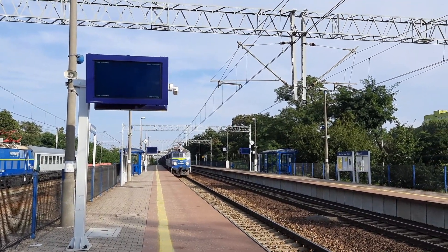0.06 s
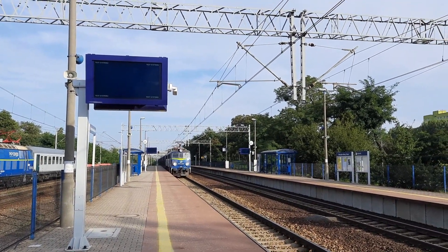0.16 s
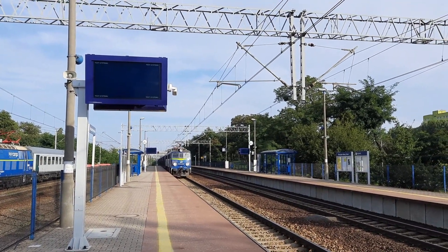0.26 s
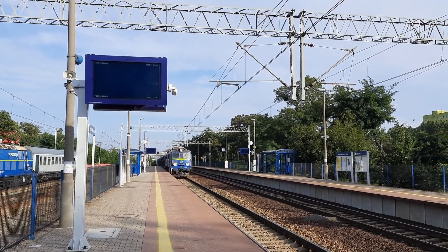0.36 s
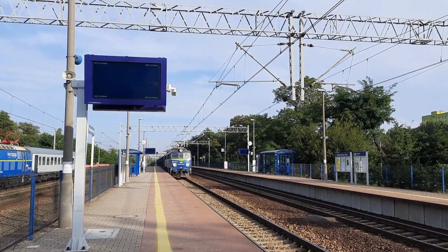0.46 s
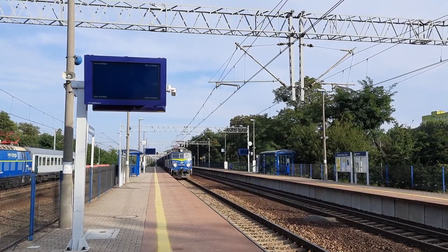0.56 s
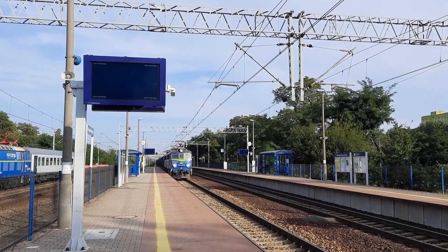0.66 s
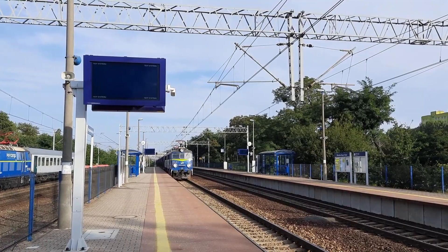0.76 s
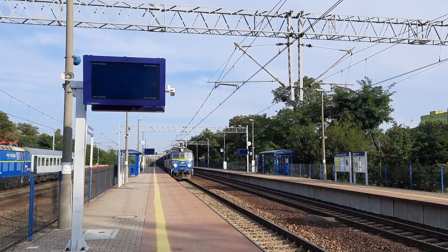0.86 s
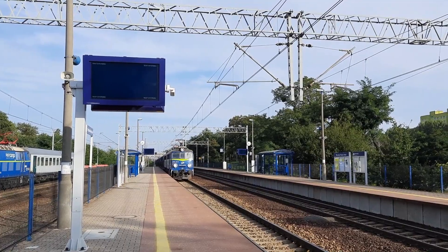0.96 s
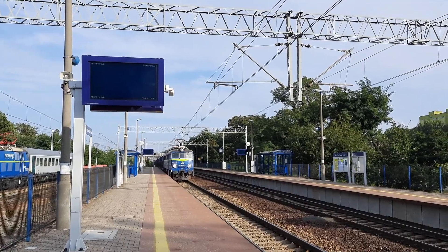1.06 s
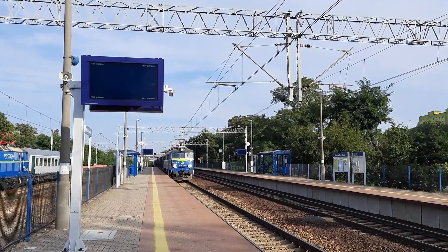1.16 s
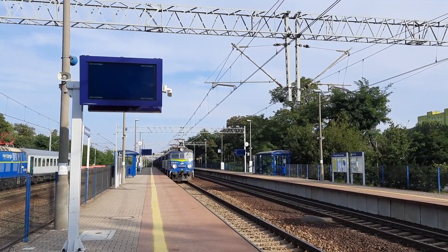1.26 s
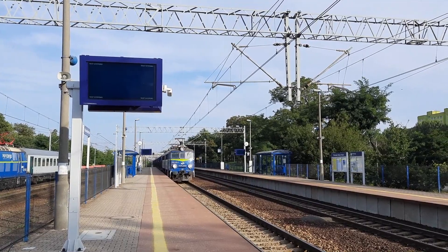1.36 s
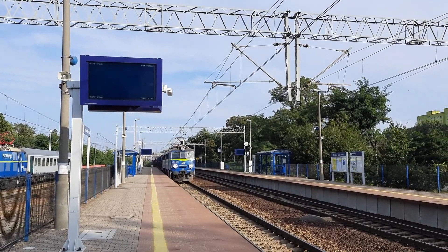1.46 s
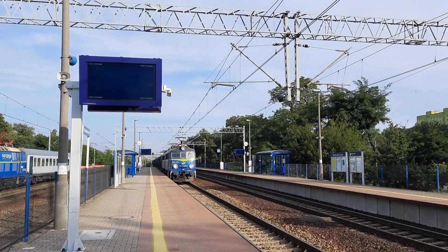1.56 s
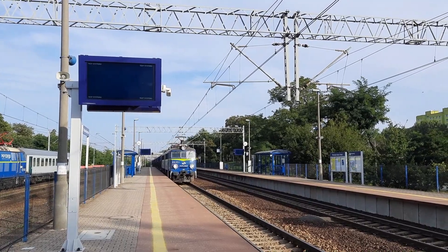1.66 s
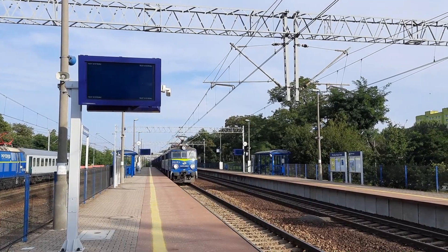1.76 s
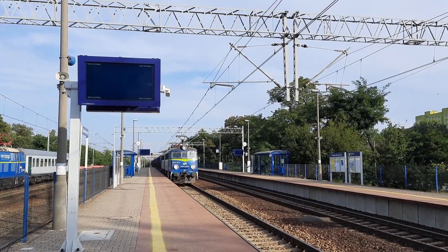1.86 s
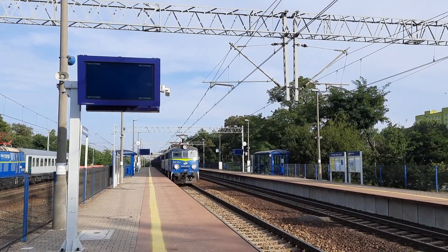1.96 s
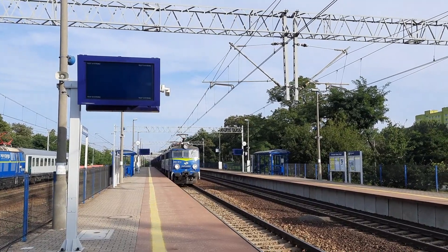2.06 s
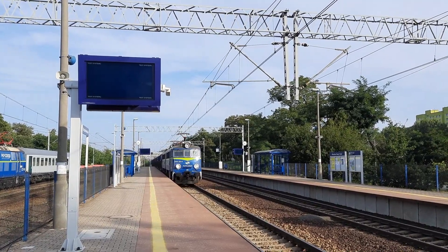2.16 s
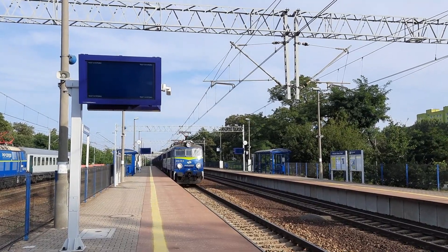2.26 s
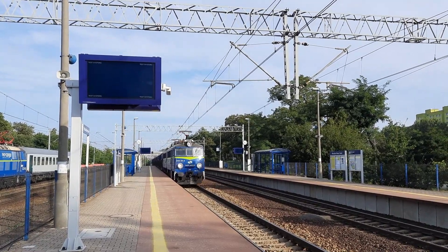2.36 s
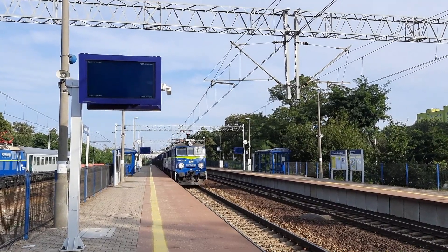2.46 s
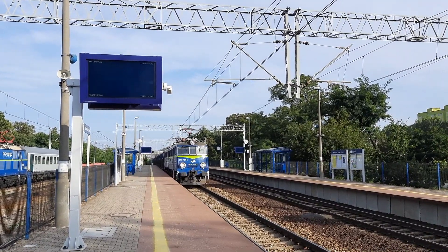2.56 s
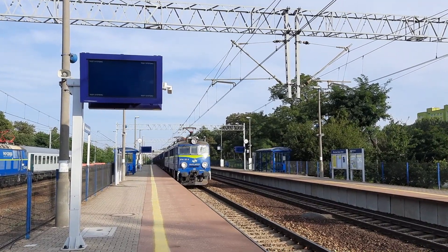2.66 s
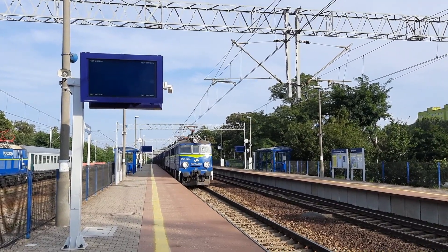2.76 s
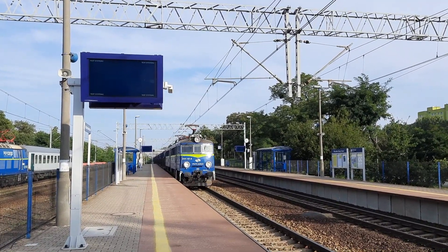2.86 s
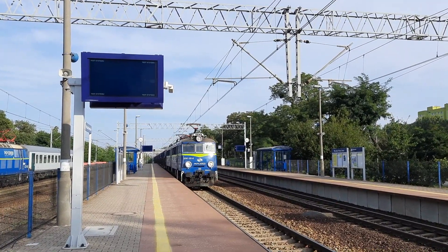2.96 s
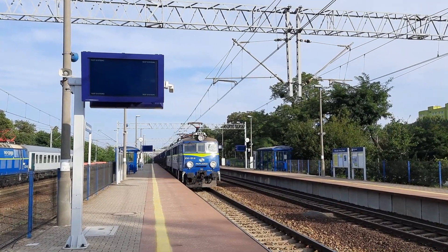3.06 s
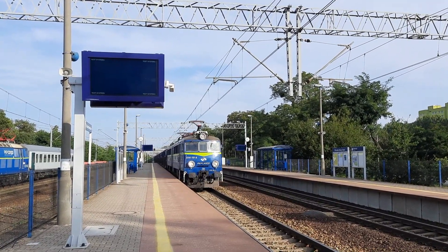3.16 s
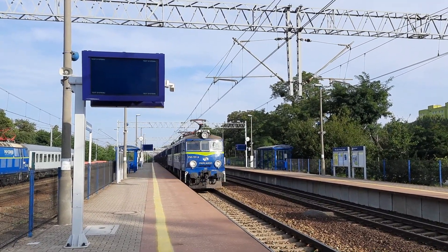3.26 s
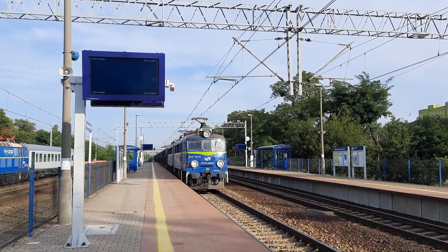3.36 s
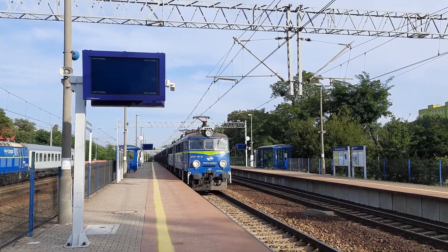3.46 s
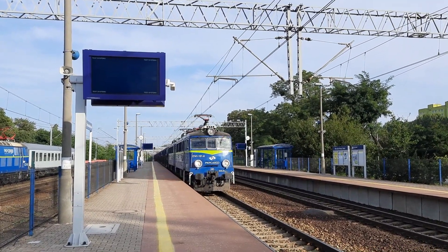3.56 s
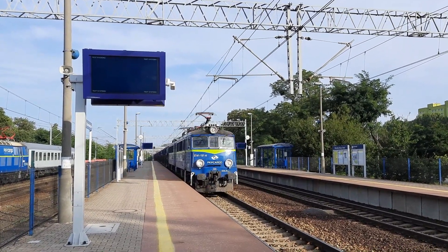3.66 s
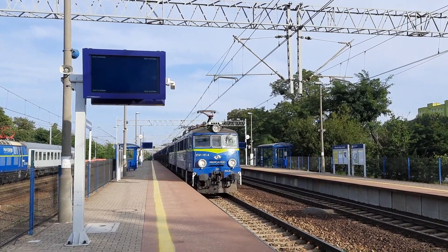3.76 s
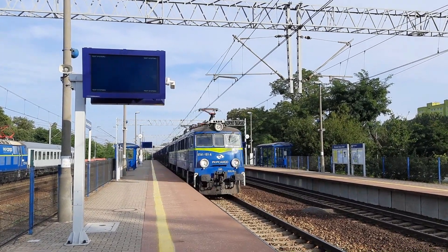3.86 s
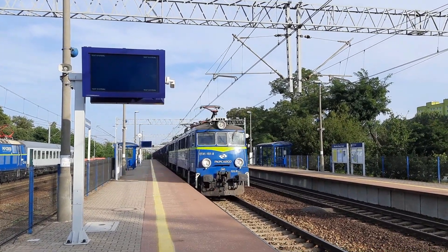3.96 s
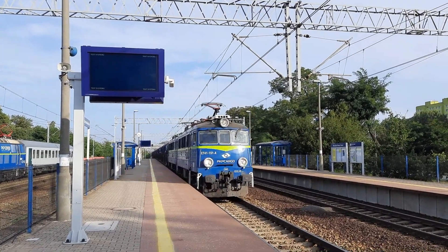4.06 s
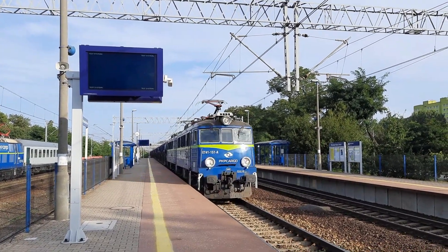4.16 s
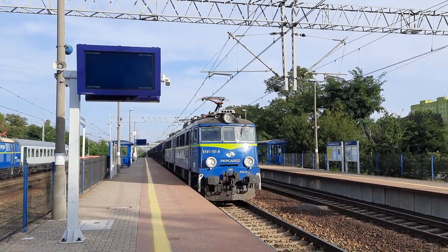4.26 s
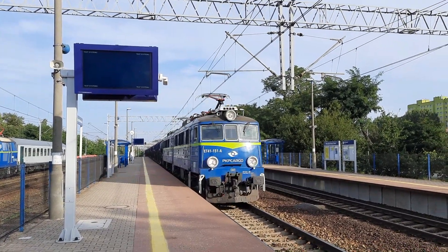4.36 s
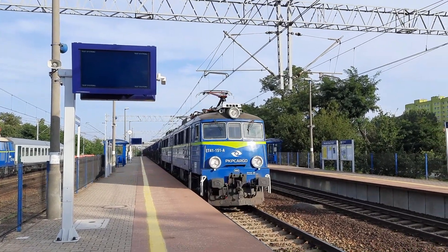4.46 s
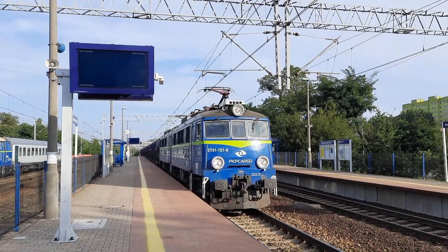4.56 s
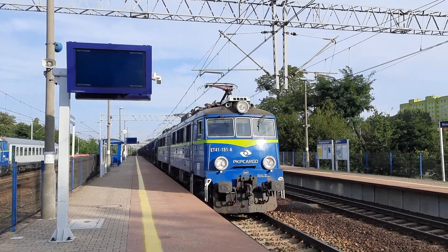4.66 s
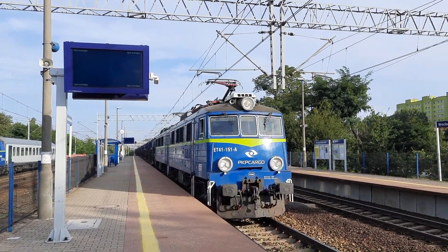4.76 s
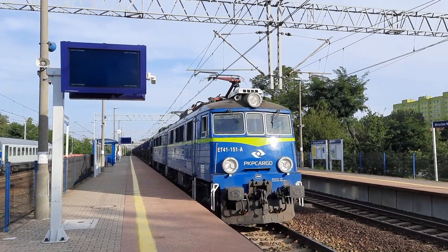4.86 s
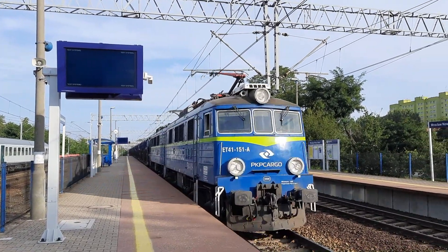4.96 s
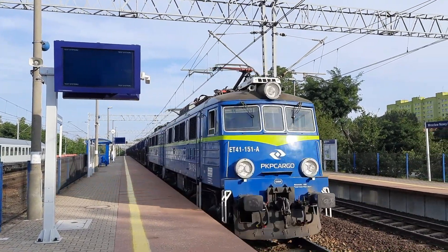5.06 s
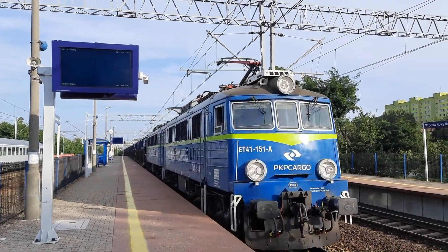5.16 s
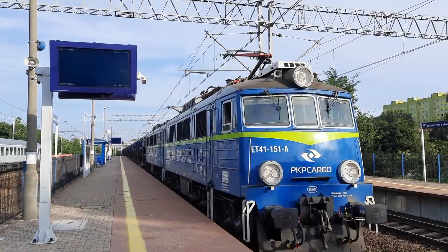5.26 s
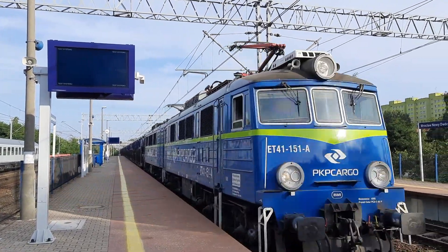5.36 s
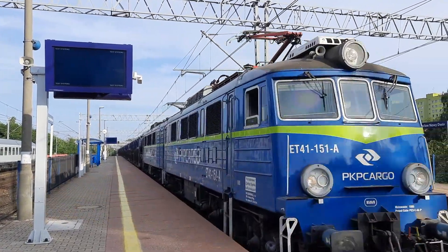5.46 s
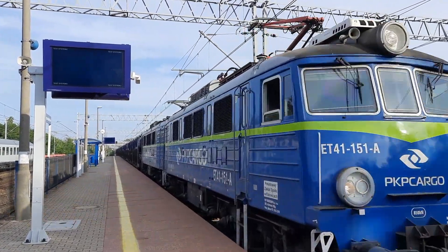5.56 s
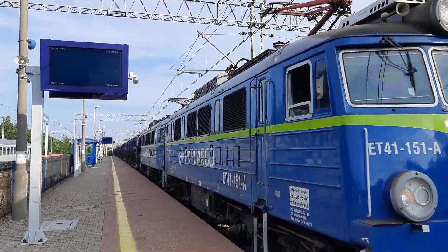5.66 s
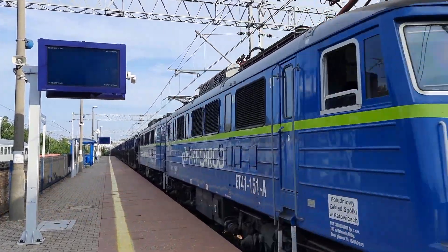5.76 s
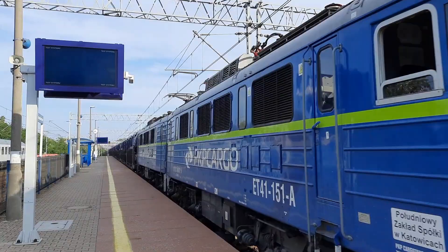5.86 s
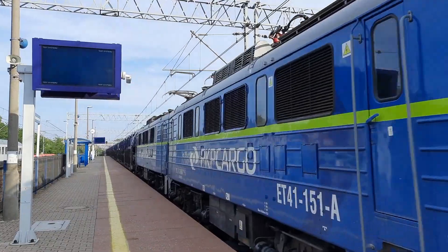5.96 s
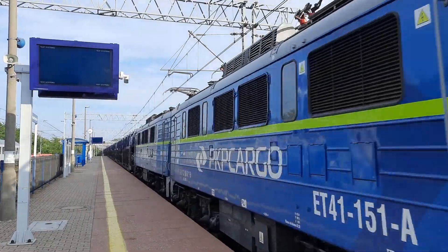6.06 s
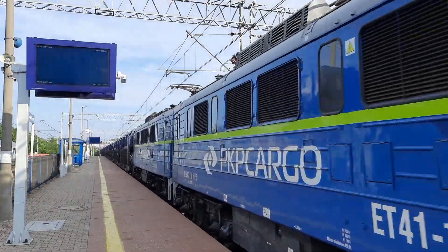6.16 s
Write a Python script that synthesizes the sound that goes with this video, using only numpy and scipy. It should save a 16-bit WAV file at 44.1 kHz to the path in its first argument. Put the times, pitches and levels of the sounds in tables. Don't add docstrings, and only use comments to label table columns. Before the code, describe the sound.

Open-air platform in stereo with soft low wind buffeting. From 0 s an electric locomotive is distant: a low, rough gear hum, several related tones around 200 to 600 Hz, throbbing irregularly as motors beat, over faint rumble and gritty wheel rush. At 0.7 s a bright click and short fizzing burst of compressed air, with a thin whistle, sounds slightly right and dies in a brief echo. From 1 to 4 s the hum edges up in pitch and swells steadily; sleepers and rails rumble more, with tiny, very high flange flickers. After 4 s these squeaks come more often. Around 5.2 to 5.4 s a quick string of valve spits sputters. The leading wheels' close, rattling roar peaks from 5.5 s as the engine passes, with a faint air leak near 6 s. Hum, heavy rumble, grinding and hiss stay loud to the end, at about 6.2 s.

```python
import sys
import numpy as np
from scipy import signal
from scipy.fft import rfft, irfft, next_fast_len
from scipy.io import wavfile
from scipy.ndimage import uniform_filter1d, map_coordinates

SR = 44100
rng = np.random.default_rng(int(sys.argv[2]) if len(sys.argv) > 2 else 0)


def log_audio(samples):
    frames = np.atleast_2d(samples).T
    limited = np.clip(frames, -1, 1)
    pcm = np.round(limited * 32767).astype(np.int16)
    wavfile.write(sys.argv[1], SR, pcm)


def boost(x):
    u = np.asarray(x, float) / 20
    return 10 ** u


N = 274302

# time in seconds, locomotive and wagon levels in dB under arrival.
APPROACH = [(0.0, -20.5, -13), (0.78, -16, -9.5), (1.56, -14, -8.5), (2.33, -10, -6.5), (3.11, -8.5, -4),
            (3.89, -5.5, -3.5), (4.66, -4.5, -1), (5.44, -3, -1.3), (6.22, 0.5, -1)]
# time in seconds, rate in Hz.
TOOTH_RATE = [(0, 101.8), (1, 102.8), (2, 104), (3, 104.6), (4, 106.1), (5, 106.5), (6.22, 106.4)]
# multiple, level at arrival in dB, growth in dB per dB of nearness,
# roughness as a ratio, sideband knots per second, port lead as a ratio.
GEAR_ORDERS = [
    (2, -19.5, 1.345, 0.34, 45, 4.5),
    (3, -23, 1.12, 0.68, 55, -2),
    (4, -17, 1.35, 0.22, 55, 0.5),
    (6, -35, 1.44, 0.69, 41, -0.5),
]
ORDER_SIDE_DB = [-31, -25.5, -18, -7.5]
# multiple, level in dB under the fourth order, gain at the pass in dB.
FAINT_ORDERS = [(1, -32, 20.5), (5, -21.5, -1), (8, -27.5, -1.5), (10, -32, 4), (14, -46, 15)]
# time in seconds, swell or dip in dB, half length in seconds.
BEATS_ORDER_2 = [(0.06, 15, 0.049), (.16, 13.5, 0.032), (0.362, 11.5, 0.096), (1.184, -15, 0.088),
                 (1.186, 17, 0.23), (1.4, -15, 0.037), (1.552, 9.5, 0.03), (1.763, -6, 0.051),
                 (2.222, 4.5, 0.081), (2.43, -12, 0.038), (3.193, 7.5, .04), (4.237, 5.5, 0.47),
                 (4.35, -2.5, 0.12), (4.557, 1.5, .04), (4.7, -1, 0.083), (4.738, -2, .05), (4.85, 1, .03),
                 (5.69, 1, .05), (5.217, -11, 0.025), (5.457, -5, 0.058), (5.802, -1.5, 0.025),
                 (5.883, 5.5, 0.13), (6.085, -4.5, 0.054), (.44, 3, 0.042), (1.986, -4, 0.049),
                 (2.56, 2, 0.13), (2.81, 3.5, .03), (3.01, 0.5, 0.035), (3.34, -2, .04), (3.48, -3, 0.063),
                 (3.61, -5, .05), (6.002, -2.5, 0.036)]
BEATS_ORDER_3 = [(.49, 9.5, 0.034), (.91, 7.5, 0.03), (1.648, 8.5, 0.05), (2.69, 8, 0.025),
                 (2.75, -7, 0.42), (3.12, -6, 0.042), (3.2, 9.5, 0.23), (3.55, 3.5, 0.04),
                 (3.7, 6.5, 0.085), (3.8, 0, 0.025), (4.11, -8, 0.03), (4.3, -6, 0.1), (4.51, 12.5, 0.0094),
                 (5.09, 10, 0.043), (4.85, 1, 0.028), (5.4, -9, 0.086), (5.51, 7.5, 0.049),
                 (5.75, 1, 0.045), (5.62, 6.5, 0.034), (5.84, 6.5, 0.088), (5.93, -7, 0.03),
                 (6.09, -7, 0.058), (.06, 5, 0.046), (.82, 2, 0.045), (1.01, 7, .05), (1.38, 6, 0.059),
                 (1.52, -4, .07), (2.51, -7, .08), (3.02, -4, .08), (3.66, -6.5, 0.032), (4.94, -4, .05),
                 (5.35, 4, 0.034)]
BEATS_ORDER_4 = [(.29, 8, 0.055), (.62, 9, 0.4), (.69, -15, 0.03), (1.23, 9.5, 0.1), (1.64, 7.5, 0.098),
                 (2.12, -14, 0.034), (2.45, 4, 0.16), (2.64, -2.5, 0.043), (2.85, 8, 0.31),
                 (3.12, -15, 0.043), (3.25, 3, 0.067), (3.57, -9.5, 0.19), (4.18, -1, 0.026),
                 (4.43, -1.5, 0.022), (3.87, 6, 0.011), (4.23, -15, 0.022), (4.56, -22, 0.031),
                 (4.87, -5, 0.13), (5.2, 1.5, 0.12), (5.419, -14, 0.016), (5.8, -1.5, 0.071),
                 (6.0, -3.5, 0.018), (6.06, -4, 0.018), (6.12, 3, .04), (6.2, -8, 0.028), (.15, 5, 0.053),
                 (.47, 1, 0.058), (.84, -6.5, 0.042), (1.09, -0.5, 0.036), (1.94, 1, 0.039),
                 (2.2, 3.5, 0.051), (2.52, 2, 0.046), (3.04, 0, .04), (3.48, -14, 0.057),
                 (3.74, 4.5, 0.049), (3.8, -8, .03)]
BEATS_ORDER_6 = [(.1, 14, 0.039), (.65, 19.5, 0.47), (.7, -12.5, 0.13), (1.32, 11.5, .15),
                 (2.1, 11.5, 0.059), (3.07, 9.5, 0.17), (3.5, 3, 0.098), (4.02, 10, 0.051),
                 (4.49, -11, 0.11), (4.67, 9, .03), (5.21, 8, 0.18), (3.7, -3, 0.055), (5.63, 3.5, .08),
                 (5.83, 9, 0.075), (6.01, 7, 0.029), (6.19, 9, 0.088), (.45, 4, .03), (1.76, -9, .1),
                 (1.9, 6, 0.046), (2.36, -9, .05), (2.44, 9, .04), (2.52, -5, .06), (3.25, -9.5, 0.12),
                 (3.8, 6, .06), (3.91, -4, 0.042), (4.28, 6, .06), (4.88, 1.5, .07), (5.3, -5, .06),
                 (5.41, 5.5, .05)]
SAG_FROM_S, SAG_HZ_PER_S = 4.3, 4.1
ROUGHENS_S, ROUGHENS_RATIO = 3.05, 0.8

# frequency in Hz, density in dB per Hz.
GROUND_SPECTRUM = [(15, -73.5), (30, -38.5), (42, -25.5), (55, -1.5), (75, -5), (110, 2.5), (160, -1.5),
                   (210, 3), (300, -64)]
SLEEPER_SPECTRUM = [(120, -19), (170, 15.5), (240, 19), (305, 17.5), (350, 9.5), (390, 10), (470, -46.5)]
RAIL_SPECTRUM = [(330, -14), (400, 0.5), (465, 1.5), (510, -5), (550, -12), (620, -8.5), (680, -16),
                 (760, -29.5), (900, -73.5)]
DISC_SPECTRUM = [(550, -48), (700, 3.5), (800, 1.5), (1050, 4), (1250, 3), (1450, -6), (1800, -58)]
GRIND_SPECTRUM = [(900, -3), (1400, 0), (1800, 1.5), (2100, 0.5), (2500, 0.5), (3000, -2.5), (3500, -1.5),
                  (4000, -4.5), (4600, -5.5), (5200, -13.5), (6000, -26.5)]
COOLING_AIR_SPECTRUM = [(4000, -25), (5000, -2), (5600, 1), (6300, -0.5), (6900, -1.5), (7400, 1.5),
                        (8000, -5), (8800, -10.5), (10000, -16)]
HISS_SPECTRUM = [(7500, -39), (8800, -11), (10000, -9), (11000, -2), (11900, 2.5), (12800, -2.5),
                 (13600, -1), (14500, -6), (15700, -3.5)]
BOGIE_SPECTRUM = [(900, -21), (1300, 7.5), (1500, 0.5), (2200, -5.5), (2900, -2.5), (4000, -6),
                  (5700, -11.5), (7000, -21.5), (9000, -45)]
# time in seconds, level in dB, half length in seconds.
AXLE_THUDS = [(0.29, -9.5, 0.043), (0.54, -4, 0.056), (0.95, -3, 0.22), (1.35, 2, 0.077), (1.95, 3.5, 0.07),
              (2.24, -12, 0.047), (2.69, -5, 0.12), (3.85, -5, 0.063), (4.84, 1.5, 0.38), (5.73, 1.5, 0.15)]
# time in seconds, level in dB, half length in seconds.
SLEEPER_STRETCHES = [(2.44, -0.5, 0.12), (2.99, -3.5, 0.86), (4.28, -3, 0.38), (3.74, 1, 0.049),
                     (4.6, -0.5, 0.092), (4.87, 3.5, 0.33), (5.4, 2, 0.13), (6.17, -1, 0.057),
                     (3.92, 0.5, 0.074), (4.43, -1, .03), (5.03, -5, 0.045), (5.33, -7, 0.033),
                     (5.69, 0.5, 0.026), (6.11, -7.5, 0.023), (.85, 0, .07), (1.06, -4.5, .07),
                     (1.77, 2, 0.08), (2.17, -2, 0.085), (3.65, -4.5, .07)]
RAIL_STRETCHES = [(0.0, 6, 0.03), (1.16, 2, 0.059), (1.37, -1.5, 0.028), (2.08, 1.5, 0.19),
                  (4.04, -9.5, 0.026), (4.35, -0.5, 0.16), (3.4, 1, .06), (4.22, 0, .08), (4.67, -1, 0.025),
                  (5.92, -0.5, .08), (5.14, 0, 0.13), (5.15, -8, 0.034), (6.09, -10, 0.3), (.39, 3.5, .07),
                  (3.08, 2.5, .05), (5.59, -4, .04)]
GRIND_STRETCHES = [(.2, 0.5, 0.22), (.8, 0.5, 0.17), (2.3, 2, 0.33), (3.0, 0, 0.15), (4.0, 0, 0.33),
                   (5.1, 0, 0.16), (5.6, -0.5, .06), (5.82, 0.5, 0.044), (5.92, -0.5, .04),
                   (6.13, -0.5, .06), (.27, 0, .05), (.59, 0, .08), (.74, 0.5, 0.052), (1.3, 0.5, .1),
                   (1.57, 0, 0.065), (1.7, 0.5, 0.068), (1.92, -2, 0.081), (2.11, -0.5, 0.11),
                   (2.73, 1, 0.12), (2.92, -0.5, .08), (3.38, 0, 0.059), (4.03, 0, .06), (4.47, -0.5, .04),
                   (4.73, -2, 0.071), (5.24, -1.5, 0.1), (6.0, -2.5, .04)]
DISC_STRETCHES = [(.15, 1.3, .15), (1.0, -0.8, 0.27), (2.2, -1.5, .2), (3.0, -3, 0.24), (3.5, -1.3, 0.13),
                  (4.5, -1.7, .15), (4.9, 1.3, 0.3), (5.5, 1, 0.22), (.48, -1, 0.053), (1.15, 0.5, 0.12),
                  (2.01, 1.5, .07), (2.16, 4.5, .04), (2.37, 2.5, 0.068), (2.65, -0.5, .07),
                  (2.79, 3, 0.067), (3.25, -0.5, .06), (3.4, 1, 0.04), (3.81, 1, 0.034), (4.59, 1, .06),
                  (4.72, -1, .07), (4.97, 0, .06), (5.53, 4.5, 0.013), (5.63, 1, 0.036), (5.7, -1.5, .05)]
# level at arrival in dB, growth in dB per dB of nearness.
GROUND_GROWTH, SLEEPER_GROWTH, RAIL_GROWTH = (-33, 0.46), (-22, 0.98), (-19.5, 0.86)
DISC_GROWTH, GRIND_GROWTH, AIR_GROWTH = (-38, 0.88), (-38.5, 0.92), (-55.5, 0.63)
HISS_GROWTH, SONG_GROWTH = (-58, 0.94), (-70.5, 1.8)
DULL_HZ, DULL_DB, DULL_GROWTH = 14400, 2, 0.45
PASS_S, BOGIE_DB, BOGIE_DB_PER_S = 5.51, -41.5, 12
MASK_DB, MASK_S = -0.5, 0.39

# opening time in seconds, peak in dB, time open in seconds, fizz over the rest in dB.
FAR_VALVE_SPITS = [
    (.6945, -34, .004, -10),
    (.7015, -33, .05, 1),
    (.75, -50, .022, 15),
]
NEAR_VALVE_SPITS = [
    (5.2355, -36, .004, -9),
    (5.2405, -44, .024, 4.5),
    (5.266, -45.5, .022, 0),
    (5.29, -48, .014, 5),
    (5.3215, -45, .014, 6),
    (5.34, -53, .01, 6),
    (5.355, -57, .012, 5),
    (5.978, -54.5, .035, -1),
]
# level in dB, opening time in seconds, sag in dB per second,
# closing rate in dB per second.
FAR_VALVE = [
    (-6.5, 0.0065, 170, 800),
    (-5.5, 0.009, -20, 700),
    (-6.5, .010, -0.5, 500),
    (-10.5, .05, 0, 100),
]
NEAR_VALVE = [
    (-1, .012, 120, 900),
    (-2.5, .003, 90, 1100),
    (-1.5, .004, 90, 800),
]
# frequency in Hz, density in dB per Hz.
FAR_THROAT = [(3900, -33), (4200, -5), (4400, 0), (4850, -0.5), (5400, 2), (5900, -7), (6200, -35)]
FAR_NOZZLE = [(6050, -30), (6300, -9), (6480, -13), (6700, -7), (7000, -1), (7350, -6), (7800, -5.5),
              (8300, -26), (9200, -40.5)]
FAR_FIZZ = [(7800, -35), (8800, -15), (10300, -13), (11500, -2), (12400, 6), (13500, 0), (14300, -5.5),
            (14900, -18), (15550, -4)]
FAR_WALLS = [(4800, -30), (5600, -9), (6300, -5), (6900, 0), (7500, -2), (8100, -7), (8600, -22),
             (9500, -40)]
NEAR_THROAT = [(3000, -30), (3500, -8), (4500, -11), (5300, -9), (5700, -1), (6050, -9), (6700, -26)]
NEAR_NOZZLE = [(5800, -28), (6500, -10), (7050, -4), (7450, 0.5), (7800, -5.5), (8400, -15), (9200, -30)]
NEAR_FIZZ = [(7800, -30), (8800, -8), (10300, -8), (11500, -2.5), (12300, 3), (13300, 2.5), (14500, 1),
             (15600, -8)]
FAR_ECHO_DB, NEAR_ECHO_DB, ECHO_DB_PER_S = [-14, -18, -15, -30], [-14, -17, -13], 95
# frequency in Hz, level in dB, opening time in seconds, time open in seconds.
EDGE_TONES = [(6312, -46, .709, .04), (6660, -44.5, .71, .045), (6990, -37.5, .707, .045),
              (7076, -43, .712, .04), (4830, -49, .706, .03), (12570, -47, .702, .022),
              (11826, -49, .735, .035), (13703, -49, .74, .035)]

# time in seconds, peak in dB.
FAR_SLIPS = [(1.1994, -72), (1.3309, -72), (1.5494, -70), (1.6194, -67), (1.8891, -64), (1.9994, -65),
             (2.3047, -61.5), (2.3605, -62), (2.4994, -65.5), (2.9994, -63.5), (3.5399, -61), (3.7489, -61)]
NEAR_SLIPS = [(4.2542, -55.5), (4.3949, -60), (4.6194, -57), (4.7194, -57.5), (4.9062, -51), (4.964, -47.5),
              (5.0094, -55), (5.0429, -55.5), (5.1136, -56.5), (5.4321, -49), (5.4745, -54), (5.5019, -52),
              (5.7493, -57), (5.799, -61.5), (5.8326, -61.5), (6.0053, -53), (6.0994, -59), (6.127, -56),
              (6.1544, -52), (6.1944, -55)]
# time in seconds, peak in dB, mode in Hz.
LOW_MODE_SLIPS = [(4.27, -56, 13200), (4.36, -60, 13300), (4.56, -60, 13380), (4.68, -57, 13350),
                  (4.92, -58, 13100), (4.975, -56, 13300), (5.0, -57, 13200), (5.07, -59, 13380),
                  (5.8376, -66.5, 11940), (5.889, -68, 11750), (6.075, -51, 11700), (6.1144, -55, 11400)]
SQUEAL_HZ, WAVER_RAD, SLIP_S = 13610, 12, 0.03

# frequency in Hz, density in dB per Hz.
WIND_SPECTRUM = [(15, -59), (35, -12), (60, 12), (110, 11.5), (160, 8.5), (260, 2), (400, -44.5)]
# time in seconds, level in dB, half length in seconds.
WIND_GUSTS = [(.25, -0.5, 0.091), (.55, -5, .1), (.9, 1.5, .15), (1.25, -4.5, .1), (1.6, 7, 0.23),
              (1.96, 12, .06), (2.35, -3.5, .1), (2.9, 3.5, 0.27), (3.25, 2.5, .1), (3.85, -7.5, 0.24),
              (4.25, 6, 0.13), (4.9, -3, .15), (5.35, 1.5, .15), (6.1, 8.5, .3)]
BREEZE_DB = -47.5
# frequency in Hz, in-phase part from -1 to 1, quadrature part from -1 to 1.
PORT_LIKENESS = [(60, 1, -0.03), (307, 0.96, -0.42), (489, 0.91, 0.64), (740, 0.016, -0.15),
                 (930, 0.85, -0.019), (1330, -0.11, -0.18), (1740, 0.21, -0.13), (2160, -0.36, 0.4),
                 (2400, 0.8, -0.42), (3070, -0.66, 0.6), (3310, 0.53, 0.72), (4040, -0.18, 0.22),
                 (4800, 0.36, -0.074), (4940, -0.38, 0.33)]


def unit(x):
    return x / np.sqrt(np.mean(np.abs(x) ** 2) + 1e-20)


def curves(rows):
    s, *cols = np.transpose(rows)
    return [np.interp(np.arange(N) / SR, s, c) for c in cols]


def wobble(knots_per_s):
    coarse = np.arange(0, N + 32, 32)
    knots = rng.standard_normal(int(N * knots_per_s / SR) + 4)
    return np.interp(np.arange(N), coarse, map_coordinates(knots, [coarse * knots_per_s / SR]))


def swells(rows):
    t = np.arange(N) / SR
    return sum(db * np.exp(-((t - s) / (abs(half_s) + 0.0012)) ** 2) for s, db, half_s in rows)


def grown(growth, near_db):
    return growth[0] + growth[1] * near_db


def shaped(spectrum):
    f, db = np.transpose(spectrum)
    return lambda hz: boost(np.interp(np.log(hz + 1), np.log(f + 1), db))


def ports(hz):
    f, real, imag = np.transpose(PORT_LIKENESS)
    return np.interp(hz, f, real) + 1j * np.interp(hz, f, imag)


def equal(likeness):
    return lambda hz: likeness + 0 * hz


def rush(gain, patchy_db, alike=ports):
    z = signal.stft(rng.standard_normal((2, N)), nperseg=1024)[2]
    field = uniform_filter1d(rng.standard_normal(z.shape[1:]), 8, 0)
    field = uniform_filter1d(field, 6, 1)
    pair = signal.istft(z * boost(patchy_db * unit(field)), nperseg=1024)[1][:, :N]
    size = next_fast_len(N + 8192)
    hz = np.fft.rfftfreq(size, 1 / SR)
    left, other = rfft(pair, size) * gain(hz)
    likeness = alike(hz)
    right = likeness * left + np.sqrt(np.clip(1 - np.abs(likeness) ** 2, 0, 1)) * other
    both = irfft([left, right], size)[:, :N]
    return both / np.std(both.mean(0))


def order(turns, side_db, rough, knots_per_s, lead=0):
    def skirt():
        return wobble(knots_per_s) + 1j * wobble(knots_per_s)

    drift = np.exp(1j * 0.91 * wobble(4.5))
    mid = unit(drift + rough * skirt())
    reflected = unit(np.exp(1j * 2 * wobble(1.6)) + skirt())
    side = boost(side_db) * unit(reflected - 1j * lead * mid)
    return np.sqrt(2) * np.real(np.array([mid + side, mid - side]) * np.exp(2j * np.pi * turns))


def gears():
    t = np.arange(N) / SR
    turns = np.cumsum(curves(TOOTH_RATE)[0]) / SR
    engine_db = curves(APPROACH)[0]
    sag_turns = -SAG_HZ_PER_S * np.clip(t - SAG_FROM_S, 0, None) ** 2 / 2
    blur = 1 + ROUGHENS_RATIO * np.clip((t - ROUGHENS_S) / 0.1, 0, 1)
    beats_by_order = (BEATS_ORDER_2, BEATS_ORDER_3, BEATS_ORDER_4, BEATS_ORDER_6)
    hum = 0
    for row, beats, side_db in zip(GEAR_ORDERS, beats_by_order, ORDER_SIDE_DB):
        k, db, growth, rough, knots_per_s, lead = row
        k = round(k)
        level_db = db + growth * engine_db + swells(beats)
        order_turns = k * turns
        if k == 6:
            order_turns = order_turns + sag_turns
        if k == 4:
            rough = rough * blur
            fourth_db = uniform_filter1d(level_db, SR // 2)
        hum = hum + boost(level_db) * order(order_turns, side_db, rough, knots_per_s, lead)
    passing = np.exp(-((t - 5.8) / 0.23) ** 2)
    for k, db, pass_db in FAINT_ORDERS:
        tone = order(round(k) * turns, -12.0, rough=1.4, knots_per_s=45)
        hum = hum + boost(fourth_db + db + pass_db * passing) * tone
    return hum


def rolling():
    engine_db = curves(APPROACH)[0]
    ground_db = grown(GROUND_GROWTH, engine_db) + 2.2 * swells(AXLE_THUDS) + 1.2 * wobble(12)
    ground = boost(ground_db) * rush(shaped(GROUND_SPECTRUM), 1.0, equal(0.92))
    sleeper_db = grown(SLEEPER_GROWTH, engine_db) + swells(SLEEPER_STRETCHES) + 1.4 * wobble(9)
    sleepers = boost(sleeper_db) * rush(shaped(SLEEPER_SPECTRUM), 1.0)
    rail_db = grown(RAIL_GROWTH, engine_db) + swells(RAIL_STRETCHES) + 0.21 * wobble(7.0)
    rail = boost(rail_db) * rush(shaped(RAIL_SPECTRUM), 0.5)
    return ground + sleepers + rail


def wheels():
    engine_db, wagons_db = curves(APPROACH)
    wagons_db = wagons_db + swells([(PASS_S, MASK_DB, MASK_S)])
    flutter = wobble(8)
    disc_db = grown(DISC_GROWTH, wagons_db) + swells(DISC_STRETCHES) + 0.7 * flutter
    discs = boost(disc_db) * rush(shaped(DISC_SPECTRUM), 1.7)
    grind_db = grown(GRIND_GROWTH, wagons_db) + swells(GRIND_STRETCHES) + 0.17 * flutter + 0.69 * wobble(40)
    grind = boost(grind_db) * rush(shaped(GRIND_SPECTRUM), 1.7)
    air_db = grown(AIR_GROWTH, wagons_db) + 0.19 * flutter
    air = boost(air_db) * rush(shaped(COOLING_AIR_SPECTRUM), 1.5, equal(0.05))
    hiss_db = grown(HISS_GROWTH, (wagons_db + engine_db) / 2) + 0.4 * flutter
    hiss = boost(hiss_db) * rush(shaped(HISS_SPECTRUM), 3.0, equal(-0.05))
    top = signal.sosfiltfilt(signal.butter(8, DULL_HZ, "highpass", fs=SR, output="sos"), hiss)
    dulled_top = top * boost(DULL_DB + DULL_GROWTH * engine_db)
    return discs + grind + air + hiss - top + dulled_top


def bogie():
    rattle_db = 1.7 * wobble(60)
    away_db = -BOGIE_DB_PER_S * np.clip(PASS_S - np.arange(N) / SR, 0, None)
    return boost(BOGIE_DB + away_db + rattle_db) * rush(shaped(BOGIE_SPECTRUM), 3.5, equal(0.16 + 0.2j))


def spit(opens_s, stays_s, opening_s, sag_db_per_s, closing_db_per_s, echo_db):
    t = np.clip(np.arange(N) / SR - opens_s, 0, None)
    shut = np.clip(t - stays_s, 0, None)
    direct = boost(-sag_db_per_s * (t - shut) - closing_db_per_s * shut)
    echo = boost(echo_db - ECHO_DB_PER_S * shut)
    return np.clip(t / opening_s, 0, 1) ** 2 * np.hypot(direct, echo)


def jets(spits, valve, spectra, alike, echoes_db, sputter_db):
    shared, air = wobble(170), 0
    for (db, *shape), echo_db, spectrum, fizzy in zip(valve, echoes_db, spectra, (0, 0, 1, 0)):
        power = 0
        for opens_s, peak_db, stays_s, fizz_db in spits:
            gain = boost(peak_db + db + fizzy * fizz_db)
            power = power + (gain * spit(opens_s, stays_s, *shape, echo_db)) ** 2
        sputter = unit(boost(sputter_db * (shared + wobble(130))))
        air = air + np.sqrt(power) * sputter * rush(shaped(spectrum), 2.5, alike)
    return air


def valves():
    def late(hz):
        return 0.3 * np.exp(2j * np.pi * hz * 0.000446)

    far_spectra = (FAR_THROAT, FAR_NOZZLE, FAR_FIZZ, FAR_WALLS)
    near_spectra = (NEAR_THROAT, NEAR_NOZZLE, NEAR_FIZZ)
    far = jets(FAR_VALVE_SPITS, FAR_VALVE, far_spectra, late, FAR_ECHO_DB, sputter_db=1.1)
    near = jets(NEAR_VALVE_SPITS, NEAR_VALVE, near_spectra, equal(0.05), NEAR_ECHO_DB, sputter_db=0.8)
    return far * boost([[-0.8], [0.8]]) + near * boost([[-1.6], [1.6]])


def whistle():
    t = np.arange(N) / SR
    tones = 0
    for hz, db, opens_s, stays_s in EDGE_TONES:
        level = boost(db + 3 * wobble(90)) * spit(opens_s, stays_s, 0.006, 40, 700, -18)
        tones = tones + level * np.sin(2 * np.pi * hz * t + 0.6 * wobble(70))
    return np.array([np.roll(tones, 20), tones]) * boost([[-0.8], [0.8]])


def flange():
    def mode(hz):
        return 1 / (1 + ((hz - SQUEAL_HZ) / 80) ** 2)

    t = np.arange(N) / SR
    song_db = grown(SONG_GROWTH, curves(APPROACH)[1]) + 4.5 * wobble(25)
    song = boost(song_db) * rush(mode, -3.5, equal(0.5))
    slips = [(s, db, SQUEAL_HZ) for s, db in [*FAR_SLIPS, *NEAR_SLIPS]]
    for s, db, hz in [*slips, *LOW_MODE_SLIPS]:
        part = slice(round((s - 0.008) * SR), round((s + SLIP_S) * SR))
        swell = np.hanning(len(t[part])) ** 0.7
        scatter = uniform_filter1d(rng.standard_normal((2, SR // 5)), 220, 1)[:, :len(swell)]
        tone = np.sin(2 * np.pi * hz * t[part] + WAVER_RAD * scatter)
        song[:, part] += boost(db - 2.0) * swell * tone * boost([[1.5], [-1.5]])
    return song


def wind():
    lumps = boost(2.6 * np.array([wobble(14), wobble(21)]))
    return boost(BREEZE_DB + swells(WIND_GUSTS)) * unit(lumps) * rush(shaped(WIND_SPECTRUM), 3.0, equal(0))


def scene():
    train = (gears() + rolling() + wheels() + bogie()) * boost([[-0.45], [0.45]])
    return train + valves() + flange() + wind() + whistle()


def roll_off(x):
    return signal.sosfilt(signal.butter(12, 15790, fs=SR, output="sos"), x)


def record(dry):
    cut = signal.sosfilt(signal.butter(4, 42, "highpass", fs=SR, output="sos"), dry)
    soft = cut / (1 + np.abs(cut / 0.75) ** 6) ** (1 / 6)
    mix = signal.sosfilt(signal.ellip(10, 0.3, 70, 15700, fs=SR, output="sos"), soft)
    return roll_off(mix)


dry = scene()
out = record(dry)
log_audio(out)
```